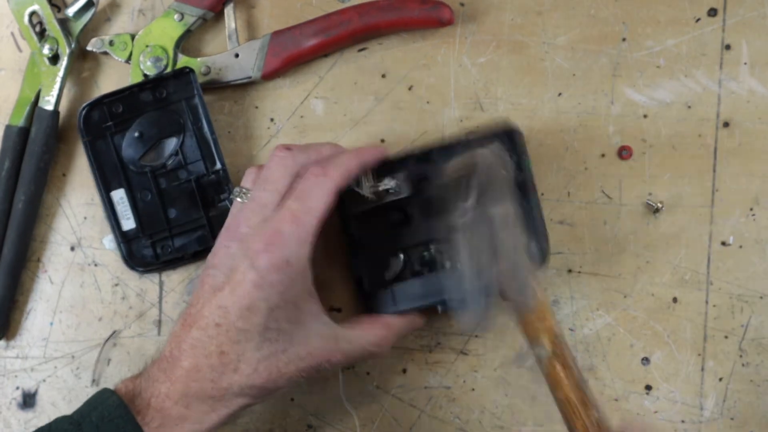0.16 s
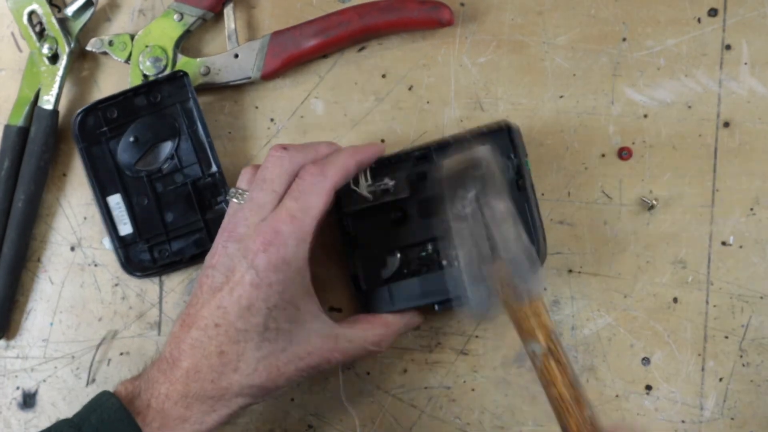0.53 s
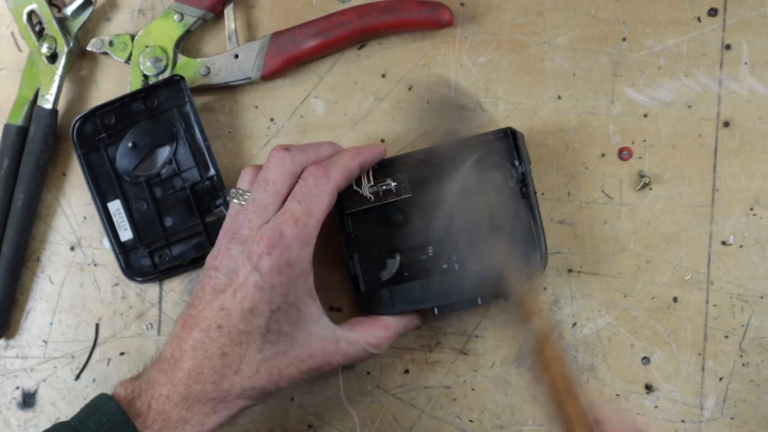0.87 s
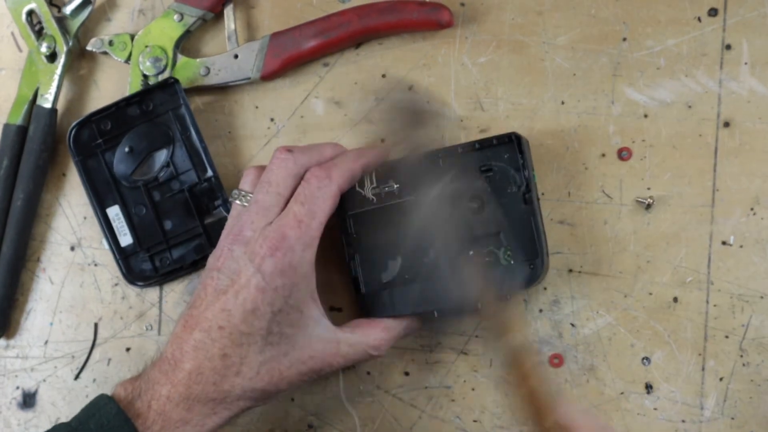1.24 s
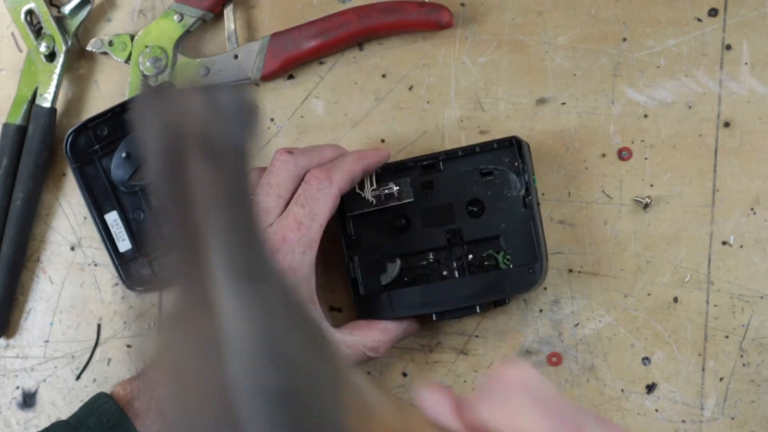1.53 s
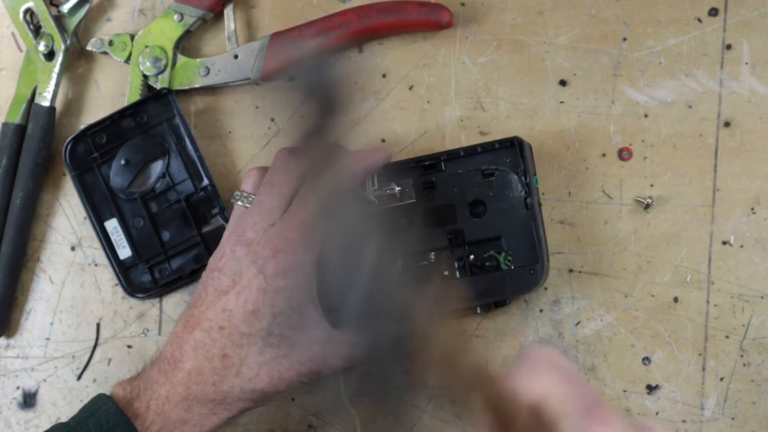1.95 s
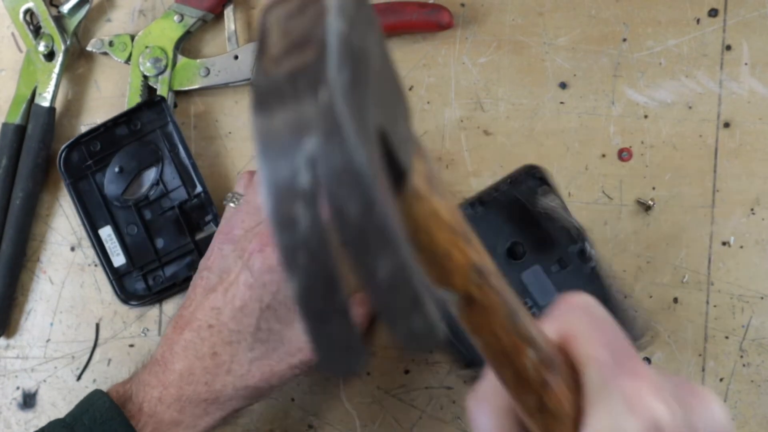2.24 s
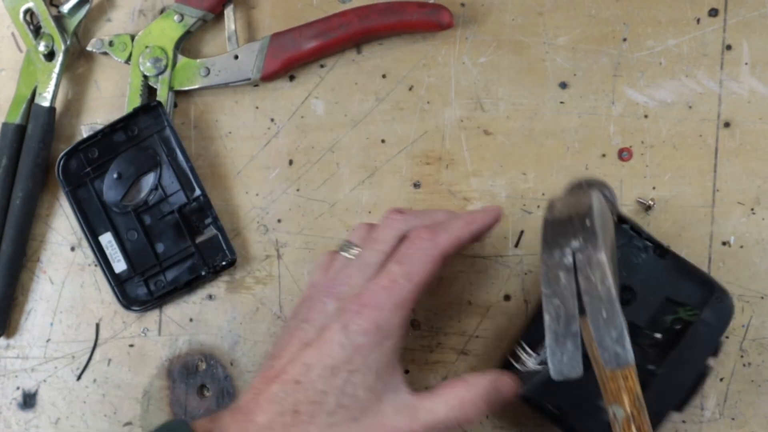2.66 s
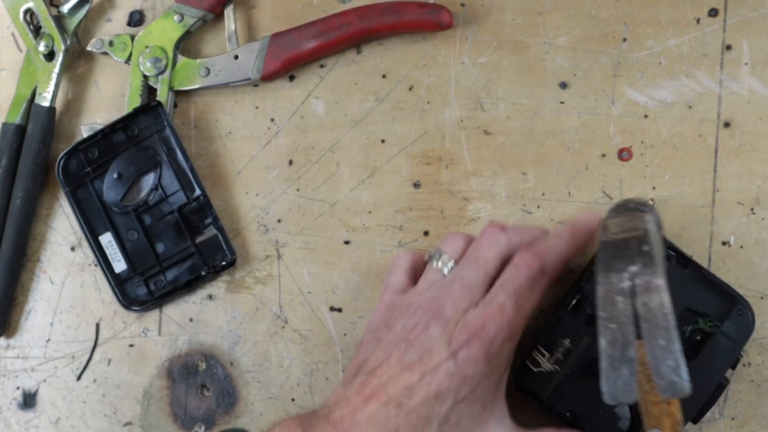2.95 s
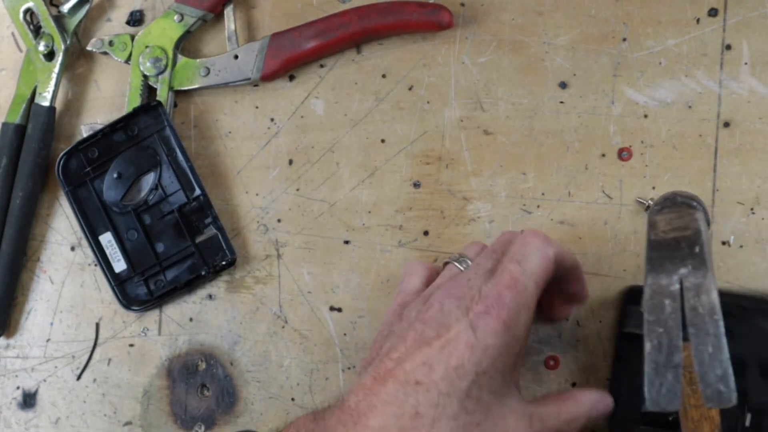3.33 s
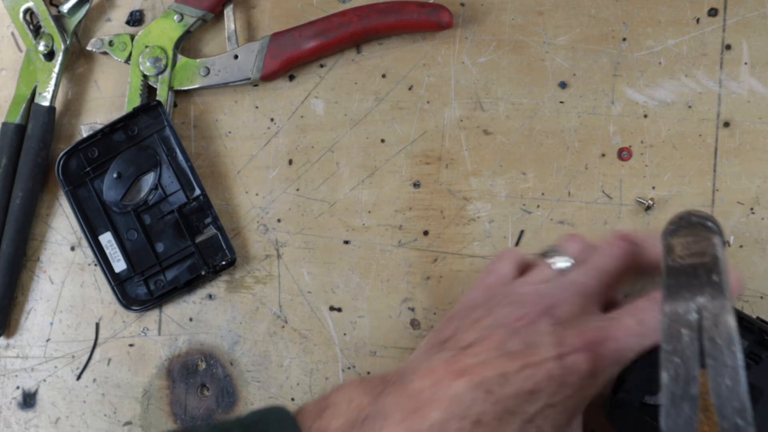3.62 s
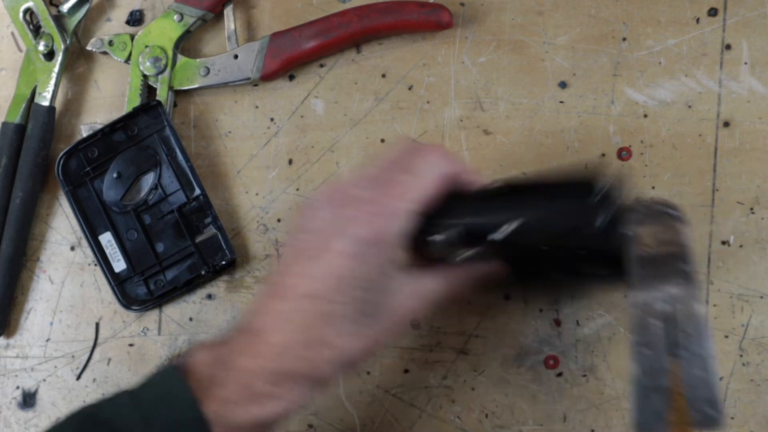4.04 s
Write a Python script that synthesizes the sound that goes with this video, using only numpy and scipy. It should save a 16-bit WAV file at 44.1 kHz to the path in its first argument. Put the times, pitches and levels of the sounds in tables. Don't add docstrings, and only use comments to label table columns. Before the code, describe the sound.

Six hard hammer blows crack a plastic case on a wooden bench, distorted and evenly paced, then the case tumbles, rattles and scrapes.

```python
import sys
import numpy as np
from scipy import signal
from scipy.fft import rfft, irfft
from scipy.io import wavfile

SR = 44100
rng = np.random.default_rng(int(sys.argv[2]) if len(sys.argv) > 2 else 0)


def to_wav(s):
    ch = np.atleast_2d(s).T
    pcm = np.round(np.clip(ch, -1, 1) * 32767)
    wavfile.write(sys.argv[1], SR, pcm.astype(np.int16))


def invert_db(x):
    u = np.asarray(x, float) / 20
    return 10 ** u


N = 184639
LEAD = SR // 4
LONG = N + LEAD


def rms_one(x):
    return x / np.sqrt(np.mean(x ** 2) + 1e-20)


def peak_one(x):
    return x / np.abs(x).max()


def at_hz(points, hz):
    table_hz, values = np.array(points).T
    return np.interp(np.log(hz + 1), np.log(table_hz), values)


def coloured(spectrum):
    hz = np.fft.rfftfreq(LONG, 1 / SR)
    white = rfft(rng.standard_normal(LONG))
    return rms_one(irfft(white * invert_db(at_hz(spectrum, hz)), LONG))


def ring(x, hz, t60):
    radius, angle = invert_db(-60 / (t60 * SR)), 2 * np.pi * hz / SR
    return signal.lfilter([0, np.sin(angle)], [1, -2 * radius * np.cos(angle), radius ** 2], x + 1e-18)


def soften(x, hz):
    r = np.exp(-2 * np.pi * hz / SR)
    return signal.lfilter([1 - r], [1, -r], x)


def butter(x, order, hz, kind):
    return signal.sosfilt(signal.butter(order, hz, kind, fs=SR, output="sos"), x)


def add(track, s, burst):
    part = track[round(s * SR) + LEAD:][:len(burst)]
    part += burst[:len(part)]


def half_octaves(white):
    edges = 45 * 2 ** np.arange(0, 8.6, .5)
    for k, (low, high) in enumerate(zip(edges, edges[1:])):
        yield np.sqrt(low * high), butter(white[k % 2], 2, [low, high], "band")


# pitch_hz, level_db (per Hz)
AIR_SPECTRUM = [(15, -42.5), (25, -17.5), (114, -11), (301, -22), (394, -18), (476, -28.5), (1890, -31.5),
                (3080, -31), (7710, -42), (16000, -43)]
# pitch_hz, level_db (rms)
MAINS_HUM = [(59.6, -74.5), (119.2, -76)]


def background():
    t = np.arange(LONG) / SR
    hum = sum(invert_db(db + 6.5) * np.sin(2 * np.pi * hz * t) for hz, db in MAINS_HUM)
    return invert_db(-67) * coloured(AIR_SPECTRUM) + hum


# pitch_hz, t60_s
ROOM_DECAY = [(60, 0.12), (250, 0.37), (1000, 0.4), (4000, 0.38), (8000, 0.32), (15000, 0.17)]
# pitch_hz, level_db
ROOM_RESPONSE = [(60, -2.5), (150, 4.5), (300, 9), (600, -12), (1500, 7.5), (4000, 4.5), (7000, -1),
                 (11000, -10), (16000, 2)]


def workshop(x):
    t = np.arange(SR) / SR
    tail = 0
    for hz, band in half_octaves(rng.standard_normal((2, SR))):
        tail = tail + band * invert_db(at_hz(ROOM_RESPONSE, hz) - 60 * t / at_hz(ROOM_DECAY, hz))
    onset = np.clip((t - .002) / 0.00067, 0, 1)
    return signal.fftconvolve(x, tail * onset)[:LONG]


# pitch_hz, level_db (per Hz)
TAIL_SPECTRUM = [(35, -43), (60, -5), (180, -4.5), (217, -5), (256, -3.5), (371, -4), (566, -5), (666, -13),
                 (1580, -17.5), (2000, -24), (7570, -23), (12100, -33), (16000, -48)]


def blow_tails():
    out = 0
    for hz, band in half_octaves(rng.standard_normal((2, LONG))):
        energy = np.zeros(LONG)
        tilt_db = 0.49 * np.log2(hz / 2000)
        for s, (*_, tail_db, boom_db) in zip(BLOW_START, BLOW_LEVELS):
            bass_db = boom_db / (1 + (hz / 600) ** 2)
            add(energy, s + 0.00067, [invert_db(tail_db + tilt_db + bass_db) ** 2])
        kept = invert_db(-120 / (at_hz(ROOM_DECAY, hz) * SR))
        energy = signal.lfilter([1], [1, -kept], energy)
        build_hz = min(hz / 15, 60)
        envelope = np.sqrt(soften(soften(energy, build_hz), build_hz))
        out = out + band * invert_db(at_hz(TAIL_SPECTRUM, hz) + 32) * envelope
    return out


# start_s (middle), level_db, pitch_hz, length_s
STICK_SLIP = [
    (3.224, -46, 1858, 0.021),
    (3.236, -41.5, 2032, 0.013),
    (3.243, -33.5, 2222, 0.012),
    (3.254, -41.5, 1935, 0.0074),
]


def squeaks():
    out = np.zeros(LONG)
    for s, db, hz, length_s in STICK_SLIP:
        t = np.arange(round(length_s * SR)) / SR
        swell = np.sin(np.pi * t / length_s)
        add(out, s - length_s / 2, invert_db(db) * swell * np.sin(2 * np.pi * hz * t))
    uneven = rms_one(soften(rng.standard_normal(LONG), 500))
    return out * (1 + .4 * uneven)


# start_s, level_db
DRAGS = [
    [(2.2, -50), (2.274, -62), (2.342, -26), (2.43, -37), (2.49, -35), (2.576, -42), (2.6, -33),
     (2.674, -47), (2.772, -51)],
    [(2.78, -53.5), (2.85, -70), (2.92, -57.5), (3.0, -73.5), (3.1, -67), (3.14, -60), (3.24, -55),
     (3.308, -66), (3.385, -69.5)],
    [(3.395, -59), (3.42, -46.5), (3.512, -60), (3.58, -63), (3.65, -74)],
    [(3.67, -60), (3.688, -50.5), (3.756, -45), (3.8, -53), (3.856, -44), (3.9, -58.5)],
    [(3.91, -40), (3.948, -38), (4.03, -33.5), (4.082, -36.5), (4.14, -59.5), (4.187, -54)],
]
# shell_db, hollow_db, rumble_db, loose_bits_db
DRAG_MIX = [
    (-7, -15, -10.5, -3),
    (-8, -12, -2, -3),
    (-12, -10, -3, 10),
    (-3.5, -13, -13, -0.5),
    (-1, -5.5, -10, 0.5),
]


def grains(per_s, most):
    strength_db = 4.5 * np.minimum(rng.exponential(1, LONG), most)
    return (rng.random(LONG) < per_s / SR) * invert_db(strength_db)


def slide():
    t = (np.arange(LONG) - LEAD) / SR
    pressure_s, pressure_db = np.concatenate(DRAGS).T
    drag = np.searchsorted([rows[0][0] for rows in DRAGS[1:]], t)
    shell, hollow, rumble, loose = invert_db(np.array(DRAG_MIX)[drag].T)
    roughness = rms_one(soften(soften(grains(1500, 4), 250), 250))
    grit = coloured(PLASTIC_SPECTRUM) * (.5 + roughness)
    case = ring(grit, 1850, .004) + ring(grit, 2400, .003)
    body = ring(grit, 400, 0.0207) + ring(grit, 950, 0.001) + invert_db(12.5) * ring(grit, 620, 0.013)
    push = soften(grit - soften(grit, 40), 140)
    wood = rms_one(ring(push, 190, 0.078))
    wood = wood + invert_db(-17) * rms_one(ring(push, 62, 0.059)) + invert_db(-7.5) * rms_one(ring(push, 140, 0.2))
    bits = coloured(PLASTIC_SPECTRUM) * soften(grains(160, 2.5), 90)
    bits = bits - soften(bits, 2600)
    mix = invert_db(-7) * rms_one(grit) + invert_db(-14.5) * shell * rms_one(case)
    mix = mix + invert_db(-5.5) * hollow * rms_one(body) + invert_db(-5.5) * rumble * wood
    mix = mix + invert_db(-15) * loose * rms_one(bits)
    return invert_db(np.interp(t, pressure_s, pressure_db, left=-120)) * mix


# pitch_hz, level_db (per Hz)
PLASTIC_SPECTRUM = [(180, -25), (300, -10), (418, -7), (478, -17), (915, 2.5), (4230, -6.5), (6740, -1.5),
                    (8360, -2.5), (9880, -11), (13500, -13.5), (16000, -26)]
# start_s, level_db (peak), pitch_hz, t60_s
CHIP_TAPS = [(0.13, -30, 4320, 0.015), (0.1488, -38, 2840, 0.043), (0.4708, -27.5, 6390, 0.036),
             (0.6956, -9, 6445, 0.0051), (0.765, -6, 7050, 0.004), (0.7784, -19, 3700, 0.039),
             (0.885, -29.5, 6400, 0.036), (0.9071, -25, 7440, 0.02), (1.2356, -26, 7890, 0.0036),
             (1.279, -37, 6230, 0.012), (1.6586, -45, 5780, 0.0094), (1.906, -42, 6740, .008),
             (1.9964, -32, 4550, 0.022), (2.042, -45, 4500, 0.0069), (2.158, -21, 7100, 0.0095),
             (2.196, -20.5, 7030, 0.024)]
TUMBLE_TAPS = [(2.2692, -14, 6090, 0.0077), (2.2749, -19, 6576, 0.026), (2.2822, -24, 8760, 0.0073),
               (2.3131, -14, 4370, 0.038), (2.3135, -0.5, 6000, 0.018), (2.3334, -5, 8300, 0.0094),
               (2.3719, -8.5, 6640, 0.024), (2.4431, -22, 6310, 0.0093), (2.4466, -27.5, 6600, 0.0073),
               (2.4603, -21.5, 4000, 0.044), (2.4675, -15.5, 6100, 0.013), (2.4778, -9.5, 2950, 0.0073),
               (2.51, -21.5, 7100, 0.04), (2.5368, -26.5, 6580, 0.02), (2.5855, -30, 8240, 0.028),
               (2.5918, -17, 6720, 0.0073), (2.5975, -16.5, 8200, 0.027), (2.6054, -30, 6480, 0.021),
               (2.6558, -21.5, 6560, 0.0098), (2.6617, -20, 2160, 0.027), (2.6863, -37, 7200, 0.023),
               (2.7002, -23.5, 4000, 0.0207), (2.707, -31.5, 6690, 0.026), (2.7413, -27, 4830, 0.0249),
               (2.7884, -32.5, 6190, 0.017), (2.7969, -30.5, 5030, 0.018), (2.807, -37, 3290, 0.018),
               (2.8176, -32, 7000, 0.017), (2.8437, -33.5, 6720, 0.04), (2.8677, -44, 6600, 0.021)]
SHUFFLE_TAPS = [(3.1392, -41, 2930, 0.022), (3.1471, -33, 2360, 0.033), (3.1626, -28, 1950, 0.019),
                (3.1697, -28, 7030, 0.012), (3.1822, -21.5, 3420, 0.024), (3.2027, -30, 6520, 0.0099),
                (3.207, -28, 6870, 0.011), (3.2263, -34, 2210, 0.047), (3.2531, -33, 1940, 0.042),
                (3.2857, -33, 2300, 0.017), (3.2933, -35.5, 6060, 0.022), (3.3049, -39, 2180, 0.028),
                (3.3279, -41, 2070, 0.019), (3.3328, -40, 1940, 0.022), (3.36, -44, 5200, 0.022),
                (3.3775, -42, 6680, 0.034)]
RATTLE_TAPS = [(3.4032, -29.5, 8270, 0.017), (3.4087, -23, 7060, 0.0156), (3.4363, -29.5, 7600, 0.025),
               (3.4421, -27.5, 7000, 0.015), (3.4494, -32, 7100, 0.0156), (3.4582, -31.5, 7500, 0.015),
               (3.4744, -25, 7570, 0.008), (3.483, -30, 6970, 0.023), (3.4987, -36.5, 7170, 0.017),
               (3.5196, -39, 6800, 0.017), (3.532, -34.5, 6700, 0.017), (3.5473, -51, 6170, 0.013),
               (3.5533, -38, 6520, 0.012), (3.5789, -60, 6560, 0.013)]
PICK_UP_TAPS = [(3.6799, -33, 6900, 0.026), (3.6889, -29, 6780, 0.022), (3.6945, -25, 3590, 0.022),
                (3.7378, -28, 6200, 0.03), (3.7796, -41, 2670, 0.022), (3.8018, -37.5, 2920, 0.022),
                (3.8223, -34.5, 6460, 0.022), (3.8501, -67, 3900, 0.022), (3.8643, -33.5, 6770, 0.022),
                (3.8788, -27.5, 2570, 0.022), (3.895, -37, 4360, 0.022), (3.9112, -26.5, 8400, 0.062),
                (3.9294, -22.5, 5090, 0.0073), (3.9512, -16.5, 5130, 0.023), (3.9654, -25, 4580, 0.022),
                (3.9815, -28.5, 6140, 0.0081), (4.0065, -23.5, 7100, 0.022), (4.0164, -23.5, 6130, 0.022),
                (4.0295, -30, 6760, 0.0073), (4.0499, -51, 6610, 0.022), (4.067, -27, 8660, 0.013),
                (4.0815, -31, 5590, 0.019), (4.0974, -25.5, 4000, 0.021), (4.1227, -36, 7600, 0.066),
                (4.1375, -25, 6230, 0.018), (4.1523, -34, 5920, 0.028), (4.1638, -27.5, 5570, 0.028)]


def taps(table, ring_db, hollow_db):
    out, t = np.zeros(LONG), np.arange(SR // 12) / SR
    noise = coloured(PLASTIC_SPECTRUM)
    bright, dull = butter(noise, 2, 1500, "high"), butter(noise, 2, 1500, "low")
    for s, db, hz, t60 in table:
        at = round(s * SR) + LEAD - len(t)
        fall = invert_db(-60 * t / max(t60, .002))
        spit = bright[at:at + len(t)] * (fall + invert_db(2) * fall ** 0.26)
        rung = ring(spit * fall, hz, 11 / hz)
        knock = dull[at:at + len(t)] * fall ** 0.33
        tap = peak_one(spit) + invert_db(ring_db) * peak_one(rung) + invert_db(hollow_db) * peak_one(knock)
        add(out, s, invert_db(db - 4) * tap)
    return out


def loose_case():
    return (taps(CHIP_TAPS, ring_db=-7.5, hollow_db=-15.5)
            + taps(TUMBLE_TAPS, ring_db=-5, hollow_db=-10)
            + taps(SHUFFLE_TAPS, ring_db=-3.5, hollow_db=-15)
            + taps(RATTLE_TAPS, ring_db=8.5, hollow_db=-10)
            + taps(PICK_UP_TAPS, ring_db=-2, hollow_db=-9.5))


# start_s, level_db, pitch_hz, t60_s
REBOUND_MODES = [
    (.716, 0, 1440, 0.011),
    (.716, -5.5, 776, 0.018),
    (0.7141, -16, 1980, 0.0018),
    (.716, -10.5, 343, 0.013),
    (2.081, -23, 70.5, 0.26),
    (2.099, -15.5, 170, 0.13),
    (2.3141, -14, 1930, 0.017),
    (2.3142, -17, 2654, 0.011),
    (2.3143, -16.5, 1290, 0.013),
    (3.041, -59, 360, .08),
]


def rebounds():
    out, click = np.zeros(LONG), np.arange(SR // 2) == 0
    for s, db, hz, t60 in REBOUND_MODES:
        add(out, s, -invert_db(db) * ring(click, hz, t60))
    return out


BLOW_START = [-.19, .186, .557, .9316, 1.314, 1.6888, 2.0534]
# strength_db, crack_length_s, sway_db, tail_db, boom_db (bass of the tail)
BLOW_LEVELS = [
    (7.5, .003, -7.5, -11, -4),
    (22, 0.0037, 1.5, -12.5, -1),
    (20, 0.0039, -2, -10, -9),
    (13, 0.0038, -5.5, -16.5, -4),
    (13.5, 0.0027, -8, -20, -.1),
    (15, .0028, -12.5, -16, -11),
    (14, 0.0042, -21.5, -19.5, -19),
]
# thinness (0-1), crack_fade_db (per s), thump_db (against strength)
CONTACT_KIND = [
    (.12, 800, -7),
    (.6, 601, -20.5),
]
# pitch_hz, level_db (per Hz)
CRACK_SPECTRUM = [(350, -23.5), (600, -7), (2220, -13), (4360, -12), (7780, -8.5), (9050, -9.5),
                  (10200, -17.5), (11900, -11.5), (15100, -34), (16200, -13)]
# pitch_hz, level_db, t60_s
TOP_MODES = [(268, 0, .085), (308, -.5, .085), (400, -9, .04), (660, -6, .015), (258, -20, .38),
             (329, -19, .45)]
# pitch_hz, level_db, t60_s
FRAME_MODES = [(34.14, -4.5, 0.65), (120.3, -11, 0.38), (172.9, -12, 0.46)]


def bench_top(t):
    push = sum(invert_db(db) * np.sin(np.pi * np.clip((t - s) / .001, 0, 1)) for s, db in [(0, 0), (.0071, -1.5)])
    top = sum(invert_db(db) * ring(push, hz, t60) for hz, db, t60 in TOP_MODES)
    return peak_one(butter(top, 2, 150, "high"))


def blows():
    near, sway = np.zeros((2, LONG))
    noise, t = coloured(CRACK_SPECTRUM), np.arange(SR // 2) / SR
    top = bench_top(t)
    for s, (db, length_s, sway_db, *_) in zip(BLOW_START, BLOW_LEVELS):
        glancing = length_s > .004
        thin, fade_db, top_db = CONTACT_KIND[int(glancing)]
        fade = invert_db(db - 14 - fade_db * np.clip(t - length_s, 0, None))
        crack = fade * noise[round(s * SR) + LEAD:][:len(t)]
        add(near, s, crack - thin * soften(crack, 1300))
        add(near, s + length_s - .0008, -invert_db(db + top_db) * top)
        add(sway, s, [invert_db(sway_db)])
    frame = sum(invert_db(db) * (ring(sway, hz, t60) - ring(sway, hz, 0.047)) for hz, db, t60 in FRAME_MODES)
    return near + frame


def scene():
    small = loose_case() + slide()
    wet = invert_db(-44) * workshop(small)
    hammer = blows() + rebounds() + blow_tails()
    return (background() + wet + squeaks() + small + hammer)[None, LEAD:]


def top_cut(x):
    return signal.sosfilt(signal.butter(12, 16300, fs=SR, output="sos"), x)


def record(dry):
    climb_db = 190 * np.arange(N) / SR
    over_db = np.clip(20 * np.log10(np.abs(dry[0]) + 1e-9) + 4, 0, None)
    held_db = np.maximum.accumulate(over_db + climb_db) - climb_db
    lag_s, duck_hz = .0017, 190
    late_db = np.pad(held_db, (round(lag_s * SR), 0))[:N]
    ducked_db = soften(soften(late_db, duck_hz), duck_hz)
    clipped = np.clip(dry * invert_db(-1.2 * ducked_db), -1, 1)
    dulled = butter(clipped, 6, 16300, "low")
    return top_cut(dulled)


dry = scene()
out = record(dry)
to_wav(out)
```